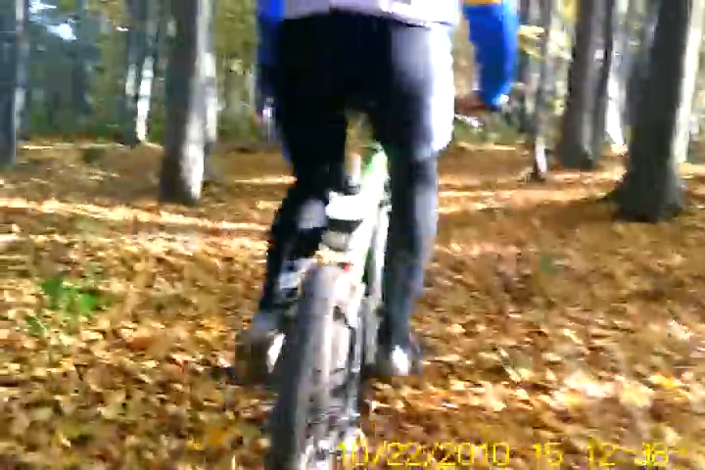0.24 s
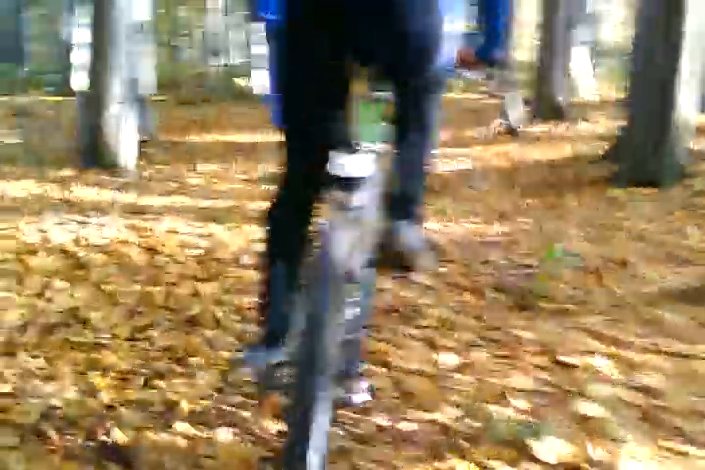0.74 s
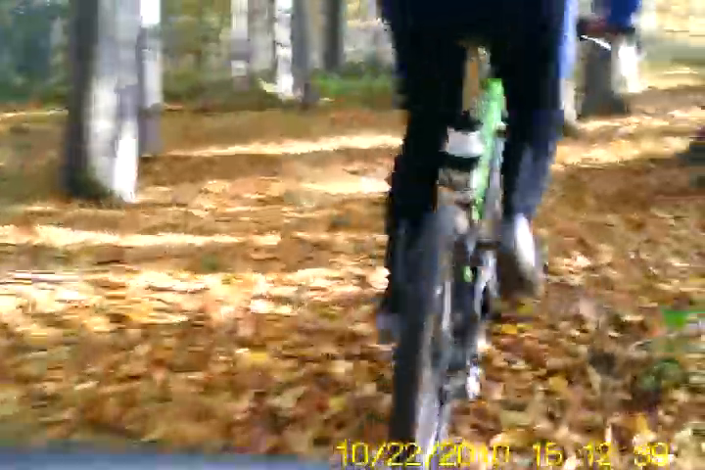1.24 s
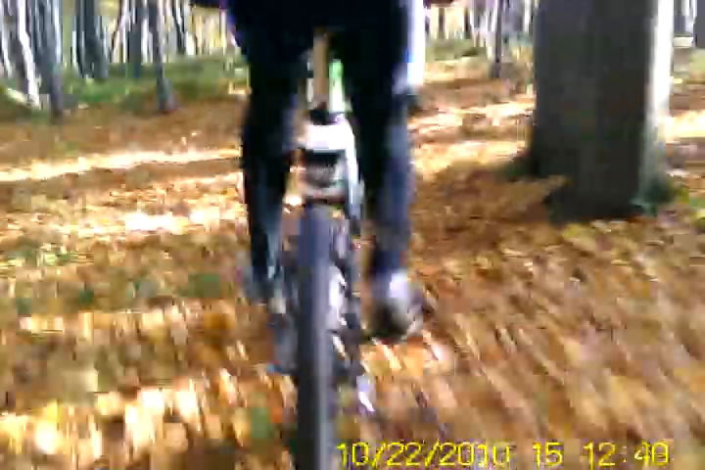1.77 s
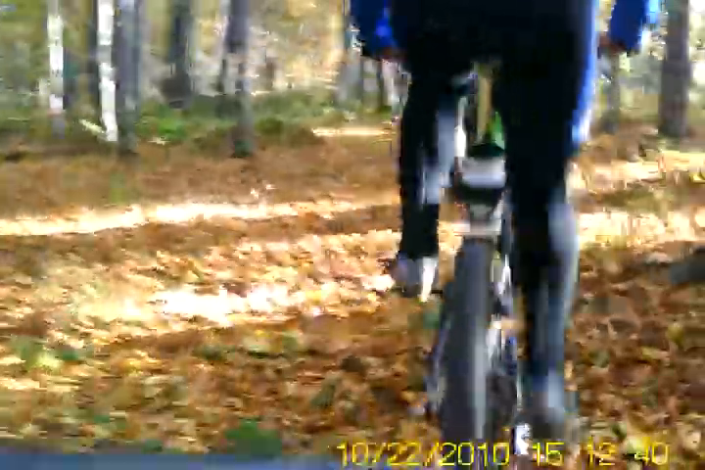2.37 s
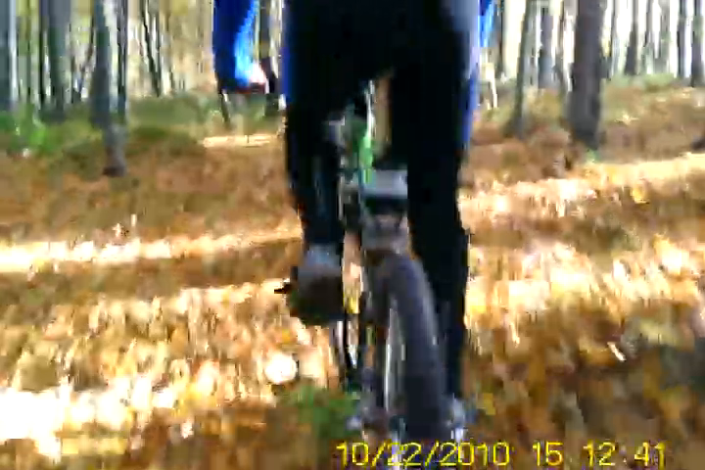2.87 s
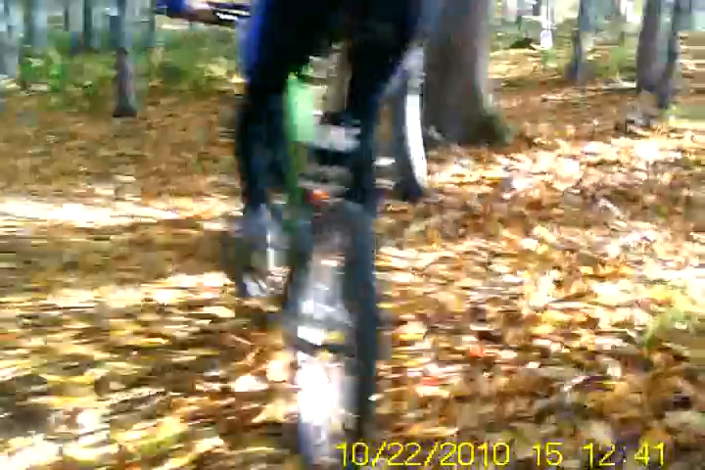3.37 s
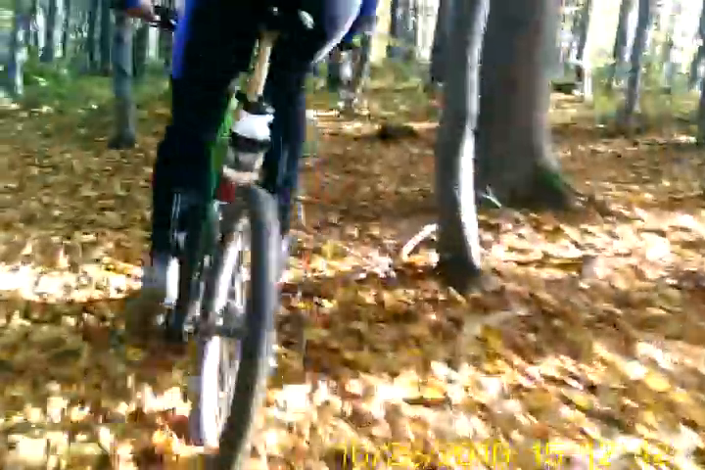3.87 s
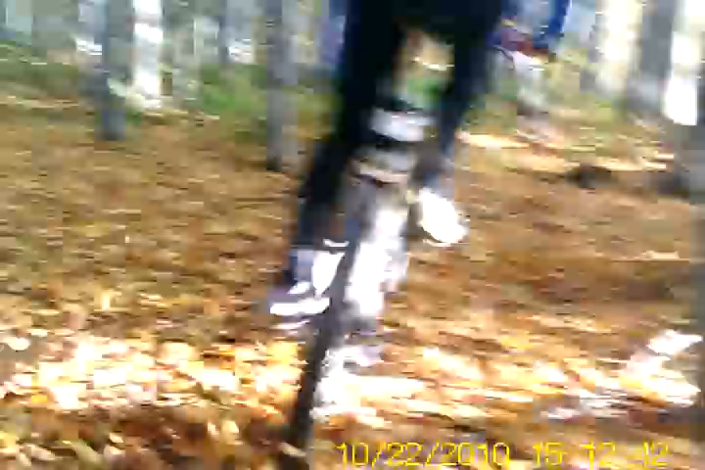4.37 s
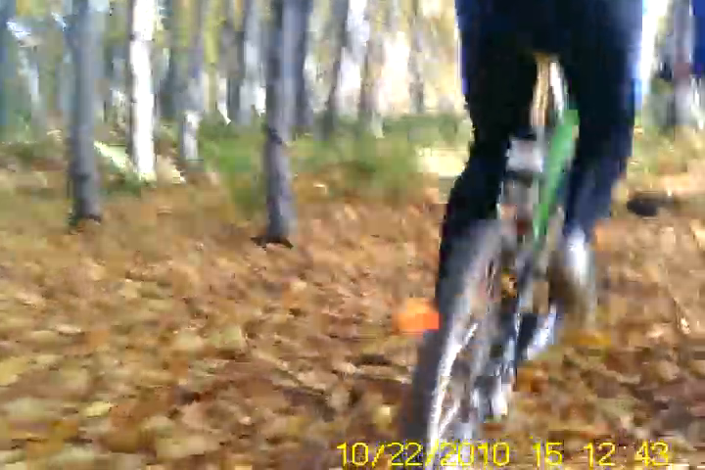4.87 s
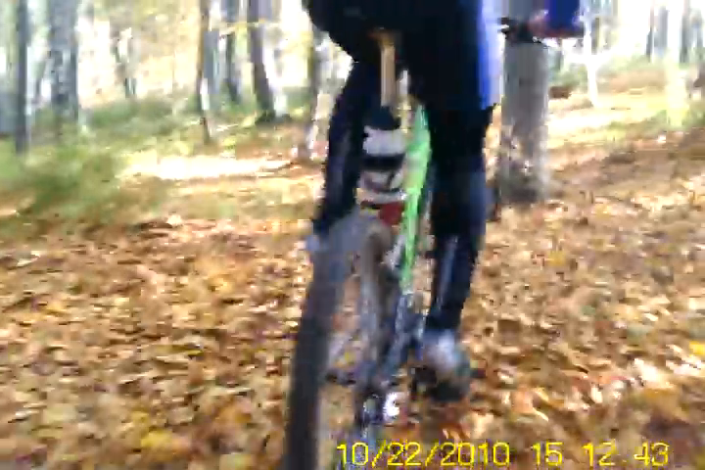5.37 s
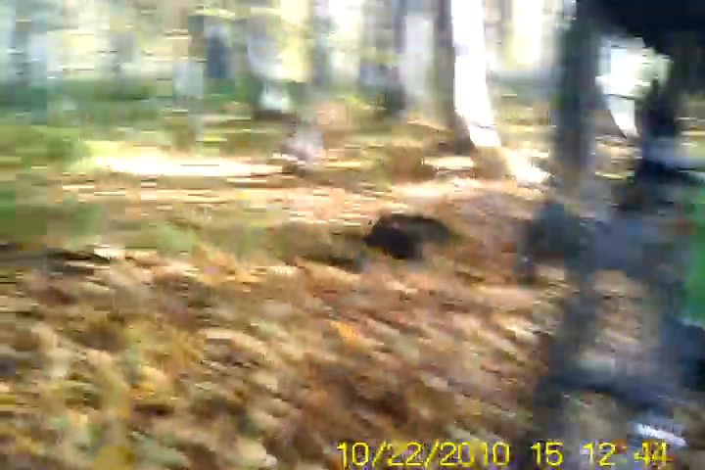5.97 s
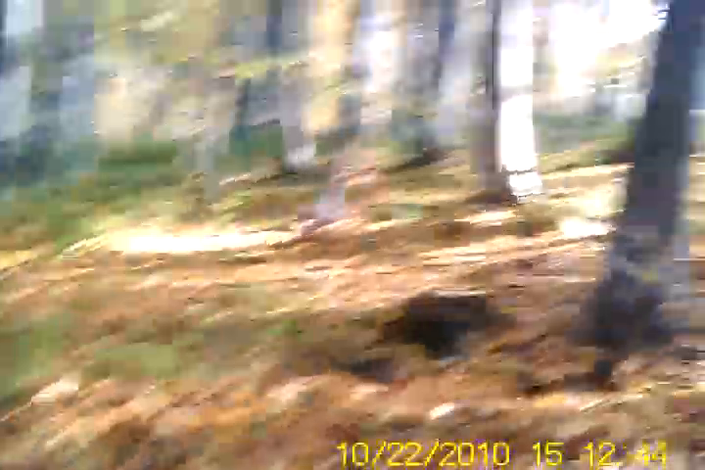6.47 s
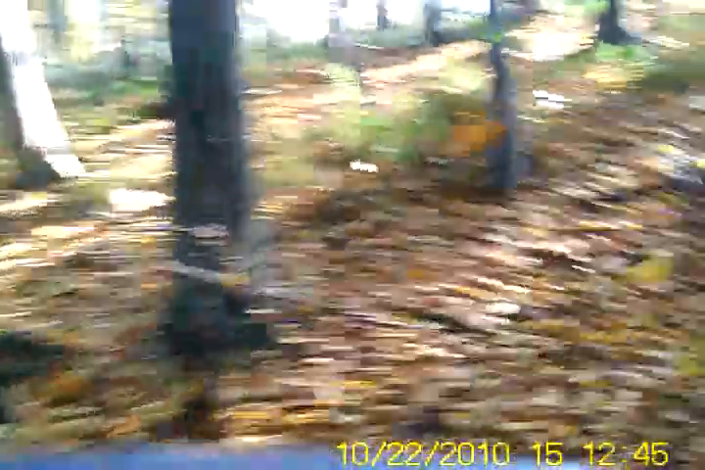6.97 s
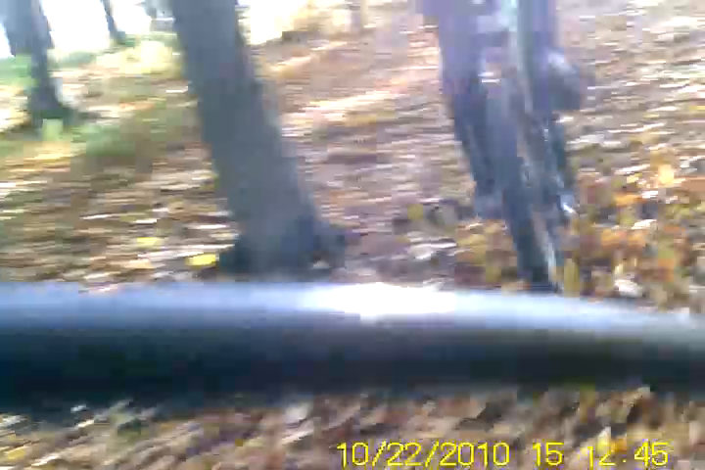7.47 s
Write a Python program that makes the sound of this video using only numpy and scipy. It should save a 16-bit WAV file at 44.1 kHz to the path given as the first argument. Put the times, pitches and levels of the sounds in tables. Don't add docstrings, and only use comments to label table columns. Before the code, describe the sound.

A small microphone on a bicycle, outdoors and close to the tyres, gives a dry, gritty, overloaded sound. Gusty low wind swells by 0.25 s over frame rumble and crackling, hissing leaves. A hard bump at 0.4 s brings a sharp plastic clack; more irregular knocks follow up to 2.5 s, brightest near 0.43, 0.97 and 2.18, briefly pushing the background down. At 2.6 s a big low jolt drops the background sharply; it creeps back with weaker wind, faint ticks and light thumps. A heavy thump at 3.67 s starts duller hollow knocks, densest from 4.2 to 4.9 s. A quieter leafy lull follows, then strong jolts around 5.5 s and evenly scattered clacks from 6 to 6.45 s. A brief gust and deep jolt come near 6.5 to 6.6 s, then soft rustle until a heavy bump and loud clack at 7.42 s, fading rattles after. A very faint high electronic whine lies beneath.

```python
import sys
import numpy as np
from scipy import signal
from scipy.fft import rfft, irfft
from scipy.io import wavfile
from scipy.ndimage import uniform_filter1d

SR = 44100
rng = np.random.default_rng(int(sys.argv[2]) if len(sys.argv) > 2 else 0)


def boost_factor(decibels):
    exponent = np.asarray(decibels, float) / 20
    return 10 ** exponent


def generate_wav(sig):
    pcm = np.round(np.clip(np.atleast_2d(sig).T, -1, 1) * 32767).astype(np.int16)
    wavfile.write(sys.argv[1], SR, pcm)


N = 340893
TIME = np.arange(N) / SR


def colour(x, points, band):
    hz, db = np.transpose(points)
    size = 8192
    grid = np.arange(size // 2 + 1) * SR / size + 1
    gain = boost_factor(np.interp(np.log(grid), np.log(hz), db, right=-70))
    cepstrum = irfft(np.log(gain))
    cepstrum[1:size // 2] *= 2
    cepstrum[size // 2 + 1:] = 0
    response = irfft(np.exp(rfft(cepstrum)))
    y = signal.fftconvolve(x, response)[:N]
    part = signal.sosfilt(signal.butter(4, band, "band", fs=SR, output="sos"), y)
    return y / np.std(part)


def walk(rate):
    k = int(SR / rate)
    held = rng.standard_normal(2000)[np.arange(N) // k]
    return 2.17 * uniform_filter1d(uniform_filter1d(held, k), k)


def curve(rows):
    s, *columns = np.transpose(rows)
    return [np.interp(TIME, s, c) for c in columns]


def keep(x, edges):
    kind = "band" if np.ndim(edges) else "low"
    return signal.sosfiltfilt(signal.ellip(9, .1, 40, edges, kind, fs=SR, output="sos"), x)


# (time [s], depth [dB])
DUCKS = [(.436, 8.5), (.87, 8.5), (1.238, 5), (1.548, 3), (1.91, 3.5), (2.096, 2.5), (2.599, 28), (4.3, 1),
         (4.41, 5), (4.864, 2), (5.45, 3), (5.54, 2.5)]
RECOVER_S = 0.57


def ducking():
    gain_db = np.zeros(N)
    for s, depth_db in DUCKS:
        gain_db -= depth_db * (TIME > s) * np.exp(-np.maximum(TIME - s, 0) / RECOVER_S)
    return gain_db


def whine(duck_db):
    whine_hz = 5600
    return boost_factor(-62 + .3 * duck_db) * np.sin(2 * np.pi * whine_hz * TIME)


# (time [s], level [dB])
GUSTS = [(0, -27), (.25, -17.5), (.42, -17), (1.2, -18), (2.55, -24), (2.9, -31.5), (3.0, -29.5),
         (3.5, -36), (3.7, -36.5), (3.85, -35), (6, -35), (6.3, -44), (6.5, -28.5), (6.7, -40), (6.9, -40),
         (7.3, -48), (7.42, -42), (7.73, -45)]
# (time [s], level [dB])
TRAIL = [(0, -34), (.2, -24), (.4, -24.5), (1.6, -16), (2.5, -27.5), (2.9, -19), (3.1, -23), (3.5, -30),
         (3.7, -23), (4.1, -31), (4.95, -36.5), (5.45, -27), (5.8, -27), (6.2, -27), (6.6, -32), (7.2, -30),
         (7.35, -32), (7.73, -47)]
# (frequency [Hz], level [dB per Hz])
WIND = [(30, -10.5), (60, -6.5), (130, -3.5), (200, -7.5), (300, -14.5), (450, -20), (700, -29.5),
        (1000, -31.5), (1500, -57)]
# (frequency [Hz], level [dB per Hz])
SHAKE = [(6, -3.5), (14, -3.5), (28, -2), (50, -10), (75, -10.5), (120, -20.5)]


def wind():
    (wind_db,), (shake_db,) = curve(GUSTS), curve(TRAIL)
    gusts = boost_factor(1.52 * walk(50) + 1.35 * walk(12))
    turbulence = colour(gusts * rng.standard_normal(N), WIND, (60, 400))
    shake = colour(boost_factor(2.0 * walk(12)) * rng.standard_normal(N), SHAKE, (15, 70))
    return boost_factor(shake_db - 1.0) * shake + boost_factor(wind_db - 0.29) * turbulence


# (time [s], signed pressure [full scale], width [ms])
JOLTS = [(0.38, -0.33, 5.2), (0.407, -0.2, 3.4), (1.219, 0.091, 8.9), (1.678, 0.34, 14.3),
         (1.77, -0.15, 36), (1.796, -0.23, 3.4), (1.893, 0.11, 34), (2.571, 0.54, 11), (3.175, 0.25, 14.3),
         (3.27, -0.22, 30.0), (3.669, -0.15, 12.5), (3.811, 0.24, 12.3), (5.447, 0.56, 9.2),
         (5.493, -0.16, 11), (5.521, 0.14, 4.7), (5.534, -0.51, 15.5), (5.613, 0.23, 14),
         (5.707, -0.17, 13.0), (5.979, 0.16, 30.0), (6.028, -0.11, 7), (6.061, 0.23, 8.1),
         (6.114, -0.15, 29), (6.63, -0.59, 12.3), (6.728, 0.15, 52), (7.042, -0.13, 17), (7.411, -0.26, 28),
         (7.429, -0.48, 2.8), (7.496, 0.18, 53), (7.628, -0.15, 41), (7.701, 0.16, 30)]


def jolts():
    out = np.full(N, .012)
    for s, pressure, ms in JOLTS:
        reach = ms / 200
        near = slice(max(int((s - reach) * SR), 0), int((s + reach) * SR))
        out[near] += pressure * np.exp(-.5 * ((TIME[near] - s) * 1000 / ms) ** 2)
    return out


# (from [s], to [s], pressure [full scale])
SLIP = (7.666, 7.675, .09)
# (time [s], frequency [Hz], peak level [dB], decay by 60 dB [s])
THUMPS = [
    (0.4, 116, -4, 0.039),
    (2.777, 59.6, -19.5, 0.044),
    (2.991, 55, -19, .06),
    (3.667, 54, -8, 0.076),
    (7.421, 60, -7, 0.066),
    (7.428, 405, -15, 0.035),
]


def thumps():
    out = np.zeros(N)
    start, end, pressure = SLIP
    out[int(start * SR):int(end * SR)] = pressure
    for s, hz, db, t60 in THUMPS:
        t = np.maximum(TIME - s, 0)
        out -= boost_factor(db) * np.sin(2 * np.pi * hz * t) * np.exp(-np.log(1000) * t / t60)
    return out


def snaps(rate, spread_db):
    when, size, sign = rng.random(N), rng.exponential(size=N), rng.standard_normal(N)
    x = (when < rate / SR) * sign * boost_factor(np.minimum(spread_db * size, 24.0))
    return x / np.std(x)


# (time [s], depth [dB], dryness [dB])
LITTER = [(0, -39.5, -6.5), (.4, -31, -7), (.7, -34, -7.5), (1.7, -32, -9), (2.3, -36, -6.5),
          (2.56, -34, -8.5), (2.8, -34, -8), (3.55, -41, -6.5), (3.7, -37, -9), (3.9, -42.5, -5.5),
          (4.1, -39.5, -6), (4.95, -44.5, -5), (5.1, -39.5, -7), (5.9, -37, -4.5), (6.3, -38, -7.5),
          (6.6, -34, -7.5), (7.1, -36, -4), (7.73, -37, -8.5)]
# (frequency [Hz], level [dB per Hz])
CRACKLE = [(300, -17.5), (650, -11), (1050, -5.5), (1450, 0), (1850, -4.5), (2350, -19), (3000, -5.5),
           (3800, -15.5), (4800, -29), (6000, -37)]
# (frequency [Hz], level [dB per Hz])
HISS = [(2500, -23.5), (4000, -5), (5000, -10.5), (6200, -5), (7200, 1), (8300, -3.5), (9000, -7),
        (9800, -6.5), (10600, -8.5)]


def leaves():
    depth_db, dry_db = curve(LITTER)
    patch = walk(45)
    coarse = 0.5 * snaps(1500., 2.1) + 0.88 * rng.standard_normal(N)
    coarse *= boost_factor(.8 * patch + 1.07 * walk(140))
    fine = 0.49 * snaps(3000., 3.1) + 0.74 * rng.standard_normal(N)
    fine *= boost_factor(0.17 * patch + 1.02 * walk(70))
    crackle = boost_factor(depth_db - 0.28) * colour(coarse, CRACKLE, (900, 2200))
    return crackle + boost_factor(depth_db + dry_db + 1.43) * colour(fine, HISS, (4000, 10000))


def crack_of(chance, grit):
    t = np.arange(len(grit)) / SR
    first = np.sinc(SR / 2 * (t - .001))
    second = 1.2 * chance[15] * np.sinc(SR / 2 * (t - .0018 - 0.00099 * chance[16]))
    scrape = 0.15 * grit * np.exp(-.5 * ((t - .0014) / 0.0004) ** 2)
    bright = signal.butter(2, [1500., 9000.], "band", fs=SR, output="sos")
    crack = signal.sosfilt(bright, first - second + scrape)
    return crack / np.linalg.norm(crack)


def ring_of(k, hz, t60, chance, t):
    late = np.maximum(t - .0007 - 0.00057 * chance[0], 0)
    turn = 2 * np.pi * hz * (1 + 0.044 * (chance[1 + k] - .5))
    fade = np.log(1000) / t60
    ring = np.sin(turn * t + 1.66 * chance[7 + k]) * (1 - np.exp(-t / 0.0041)) ** 2 * np.exp(-fade * t)
    rebound = np.sin(turn * late) * (1 - np.exp(-late / 0.0012)) ** 2 * np.exp(-fade * late)
    ring += 0.15 * chance[13] * rebound
    return ring / np.linalg.norm(ring)


# (time [s], strength [dB], strike
# place [dB], hardness [dB])
KNOCKS = [(.0521, -20, 2.5, -26), (.394, -22.5, -11, -27), (.4319, -12.5, -6.5, 4),
          (.4553, -21.5, 1.5, -32), (.6461, -17.5, 0, -17.5), (.866, -16, -3, -4), (.9682, -12.5, -9, 9.5),
          (1.0773, -17.5, -1.5, -18), (1.2343, -19.5, 0, 8.5), (1.3329, -18.5, 0, -2.5),
          (1.5184, -33, 4, -7), (1.5454, -25, 9.5, 12), (1.5678, -38.5, 12.5, -24), (1.7416, -22.5, 7, -58),
          (1.9061, -18.5, 3.5, -12.5), (2.0925, -17.5, -3.5, -2.5), (2.177, -16, -13, 5),
          (2.3604, -17, 1, -18), (2.4634, -22, 4.5, -20), (2.56, -35, 2, -10), (2.577, -33.5, 1.5, -36),
          (2.7184, -42, 5.5, -54), (2.7918, -43, 1, -35), (2.9447, -30, 6, -25), (2.9964, -31.5, -2, -39),
          (3.177, -36, -3, -13), (3.2286, -37.5, 7, -46), (3.4038, -35, -1, -48),
          (3.591, -19.5, 2, -19), (3.6351, -23.5, 3.5, -23), (3.6694, -20.5, 4.5, -49),
               (3.8651, -21, -0.5, -21.5), (3.9594, -21.5, 2, -24.5), (4.2266, -18, -2.5, -36),
               (4.2854, -31, -3, -38), (4.2988, -14.5, -5, -18), (4.4078, -11, -10, -14.5),
               (4.5085, -15.5, -5, -17.5), (4.6791, -18, -6, -24), (4.7574, -18, -1, -23),
               (4.861, -15, -3, -17), (5.568, -37, -9, -3.5), (5.4125, -30.5, -3, -10), (5.438, -34, 1, -8),
               (5.443, -28, -3, -20), (5.6828, -27, 14, -17), (5.9972, -23, 2.5, -11.5),
               (6.11, -19, 3, -31), (6.2359, -18.5, -2.5, -52), (6.3421, -18.5, -1, -33),
               (6.4398, -19.5, 1.5, -36), (6.557, -33.5, -16, -5.5), (6.592, -22.5, -27, -12),
               (6.6821, -31.5, 3, -31), (6.756, -27.5, -10, -20), (7.427, -14, -1.5, -10.5),
               (7.4393, -23.5, 1, -22), (7.665, -34.5, -27, -6)]
# (time [s], strength [dB], strike place [dB])
RATTLES = [(.416, -28, -17), (0.5007, -34, -20), (.7726, -39, 6), (0.996, -40, -1), (1.0186, -40, -5),
           (1.1526, -36, -15), (1.255, -34, -16), (1.829, -37, 2), (1.9917, -34, -6), (2.5453, -33, -16),
           (2.613, -49, 6), (3.029, -41, -5), (3.3523, -38.5, -9), (3.419, -42, -4), (3.581, -37, -1),
           (3.691, -43, 9), (3.698, -34, -15), (3.708, -50, 4), (4.053, -34, -5), (4.3311, -37, -7),
           (4.438, -40, -3), (.935, -32, -5), (4.7072, -37.5, -2), (5.011, -41, 6), (5.227, -31.5, -7),
           (5.535, -40, 4.5), (5.7236, -37, -5), (5.452, -33, 0), (6.674, -44, 9), (7.5527, -41, 10)]
RATTLE_HARDNESS_DB = -24
# (frequency [Hz], decay by 60 dB [s], level [dB])
CASE = [(470, 0.004, -10), (1370, 0.0053, -0.1), (1861, 0.0053, 1.23), (3105, 0.0049, -0.17),
        (4255, 0.0041, -10.5), (4840, 0.0038, -6)]
# (share of place [dB/dB], of hardness [dB/dB], of strength over FIRM_DB [dB/dB], offset [dB])
SHARES = [(0.44, 0.34, -0.56, 3.5), (0.023, -0.045, 0.15, -0.07), (0.94, 0.00026, 0.16, -0.37),
          (0.47, 0.082, 0.18, -3.5), (0.25, 0.28, 0.48, -3.5), (0.19, 0.26, 0, -5)]
FIRM_DB = -20


def knocks():
    out, t = np.zeros(N + 2048), np.arange(768) / SR
    blows = KNOCKS + [(*row, RATTLE_HARDNESS_DB) for row in RATTLES]
    span = np.sqrt(.007 * SR)
    for s, force_db, place_db, hard_db in blows:
        chance, grit = rng.random(24), rng.standard_normal(len(t))
        hit = boost_factor(force_db + hard_db + 4.0) * crack_of(chance, grit)
        blow = (place_db, hard_db, force_db - FIRM_DB, 1)
        for k, (hz, t60, db) in enumerate(CASE):
            mode_db = force_db + db + np.dot(SHARES[k], blow)
            hit += boost_factor(mode_db) * ring_of(k, hz, t60, chance, t)
        i = int(s * SR)
        out[i:i + len(t)] += span * np.sign(chance[14] - .5) * hit
    return signal.sosfilt(signal.butter(3, 380, "high", fs=SR, output="sos"), out[:N])


def scene():
    duck_db = ducking()
    bed = boost_factor(duck_db) * (wind() + leaves())
    return (whine(duck_db) + bed + jolts() + thumps() + knocks())[None]


def roll_off(x):
    return signal.sosfilt(signal.butter(12, 16660, fs=SR, output="sos"), x)


def record(dry):
    edge_hz, mirror_hz = 10740, 11330
    top = .65
    x = dry / (1 + np.abs(dry / top) ** 12) ** (1 / 12)
    x = keep(x, edge_hz)
    bass = uniform_filter1d(np.abs(uniform_filter1d(x, size=12)), size=1200)
    dulled = uniform_filter1d(1. * (walk(30) + 12 * bass > 2), size=300)
    x = x - dulled * (x - keep(x, 10050))
    flipped = x * (-1.) ** np.arange(N)
    near = keep(flipped, [mirror_hz, 12300])
    near = signal.sosfiltfilt(signal.butter(1, [11000, 11800], "band", fs=SR, output="sos"), near)
    far = keep(flipped, [mirror_hz, 15800])
    loudness = uniform_filter1d(far ** 2, size=48)
    gate = loudness ** 2 / (loudness ** 2 + boost_factor(-22) ** 4)
    far_band = signal.butter(3, [mirror_hz, 16300], "band", fs=SR, output="sos")
    far = signal.sosfiltfilt(far_band, gate * far)
    return roll_off(x + boost_factor(-10) * near + boost_factor(-21) * far)


dry = scene()
out = record(dry)
generate_wav(out)
```